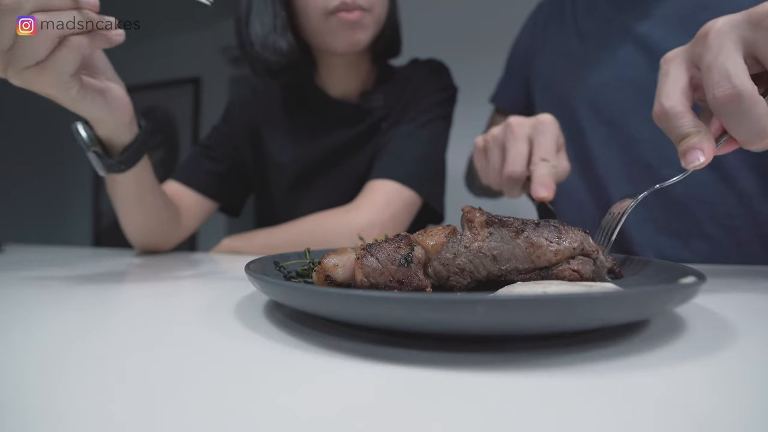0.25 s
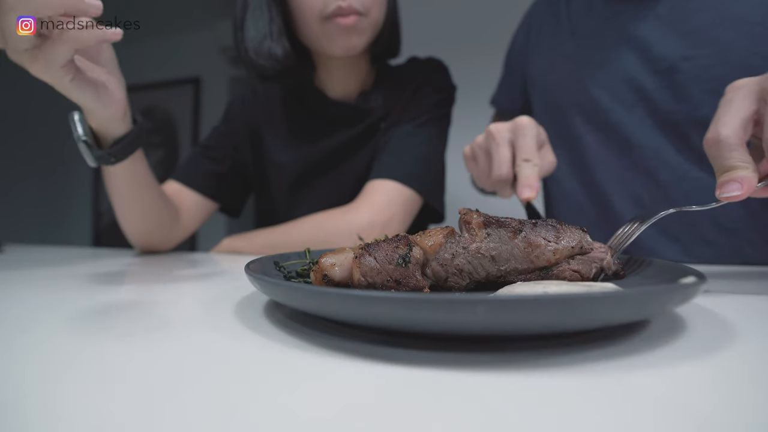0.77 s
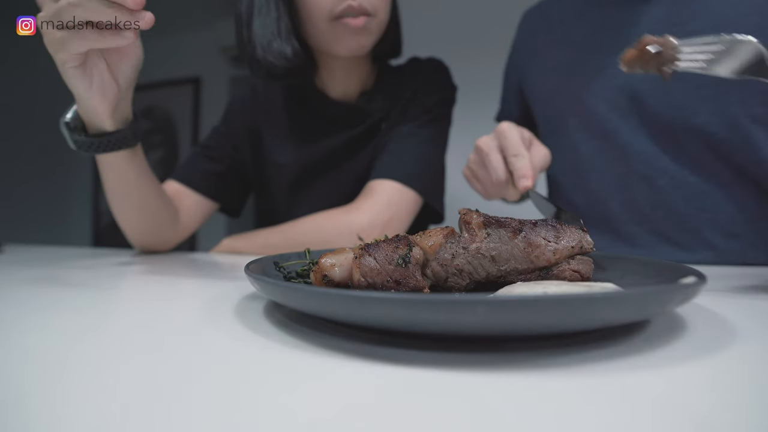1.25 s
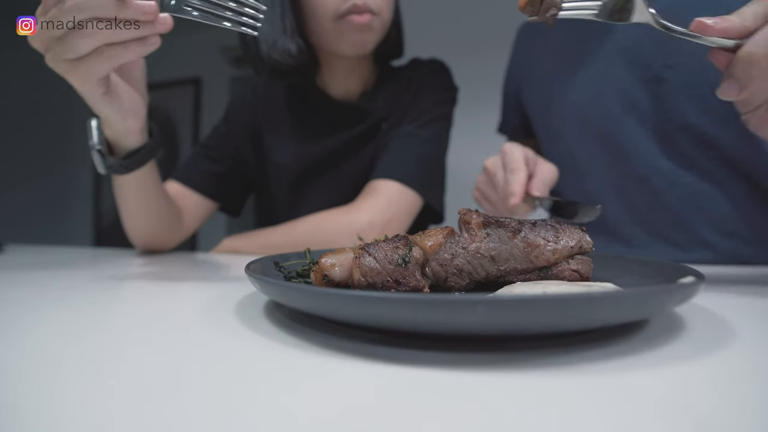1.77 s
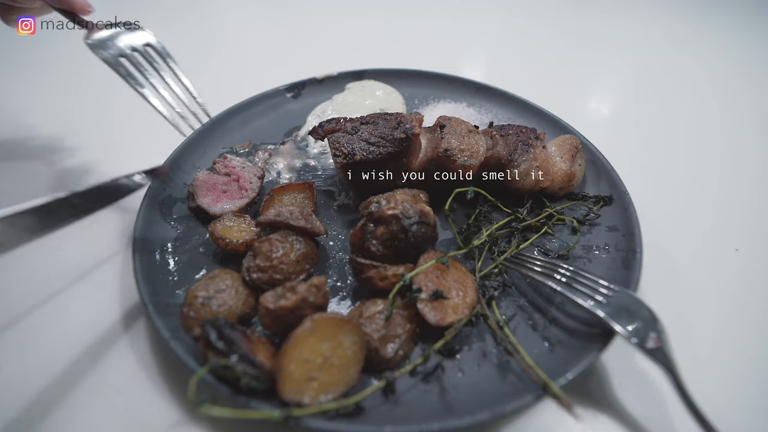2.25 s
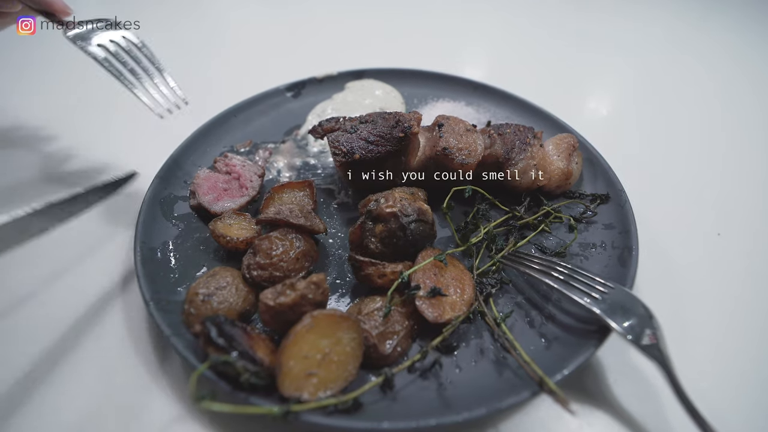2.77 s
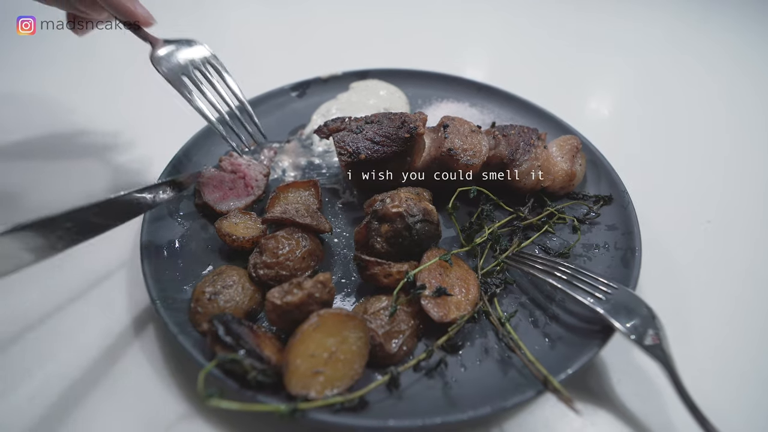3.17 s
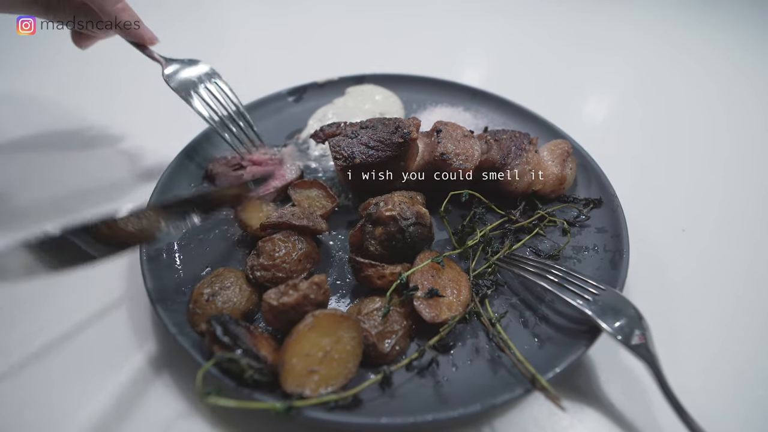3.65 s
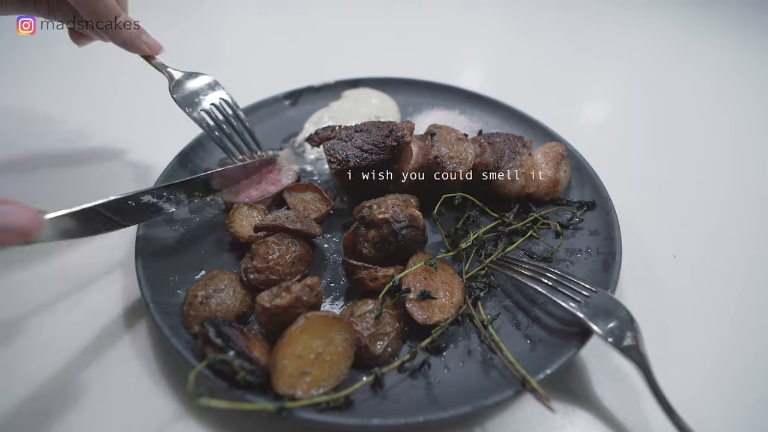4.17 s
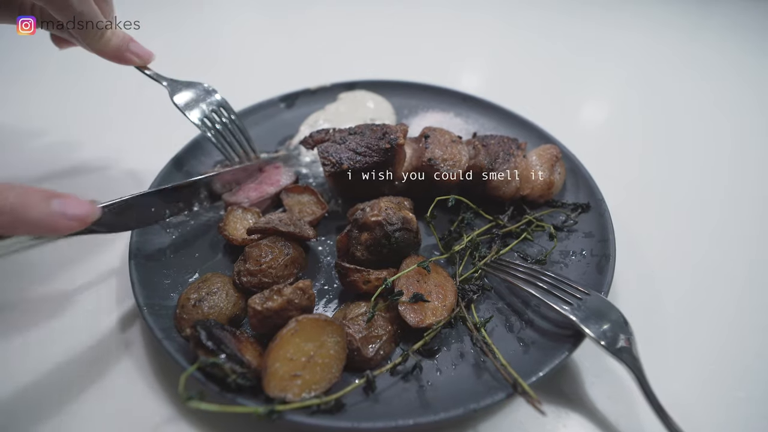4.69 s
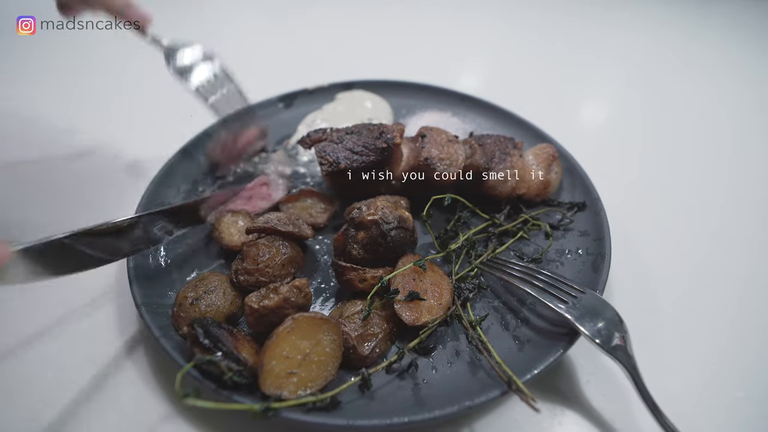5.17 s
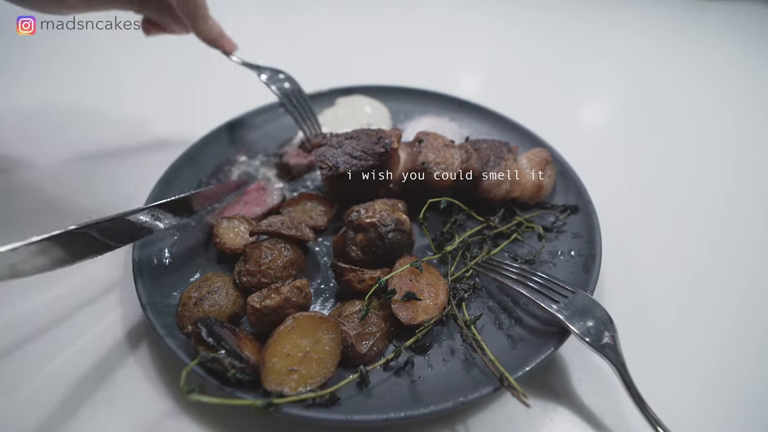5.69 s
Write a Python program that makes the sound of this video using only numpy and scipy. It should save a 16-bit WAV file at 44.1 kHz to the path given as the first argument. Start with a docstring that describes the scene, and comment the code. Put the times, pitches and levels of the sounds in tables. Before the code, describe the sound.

Two hard fork thuds and gritty scraping in a humming room; the hum drops, then a knife rings twice on ceramic, saws and squeaks.

```python
"""A steady ventilation rush in a small, live room, and a fork that jabs twice through steak and drags on glaze.
The rush drops in level, and a steel knife clinks twice on the plate, saws with ticks and scrapes, and squeaks.
Impacts are damped modes and shaped noise bursts; the plate sings as a sum of shimmering modes; scrapes are
random slips coloured by resonances; the squeak is a fluttering tone; the air is filtered noise."""
import sys
import numpy as np
from scipy import signal
from scipy.fft import rfft, irfft, next_fast_len
from scipy.io import wavfile
from scipy.ndimage import uniform_filter1d, map_coordinates

SR = 44100
rng = np.random.default_rng(int(sys.argv[2]) if len(sys.argv) > 2 else 0)


def store_wav(level_fs):
    """Save 16-bit WAV to argv[1]."""
    pcm = np.round(np.clip(np.atleast_2d(level_fs), -1, 1) * 32767)
    wavfile.write(sys.argv[1], SR, pcm.T.astype(np.int16))


N = 261513

# All table levels are relative, except where a source adds them to the mix directly.
# Knife blows on the plate: [t/s, crack level/dB, ring level/dB, share of the free ringing time]
CLINKS = [(3.391, 12, -24.5, 0.86), (4.6158, 9.5, -32.5, 0.88)]
# Colour of the crack: [f/Hz, level/dB at the first spot, level/dB at the second spot]
CRACK_COLOUR = [(80, -48, -40), (333, -17.5, -33.5), (574, -13, -18), (1100, -8.5, -14), (1750, -17.5, 1.5),
                (2250, -16, -3.5), (2850, 0, 2), (3100, 3.5, -2.5), (3420, -21.5, 1.5), (3920, -1, -3.5),
                (4500, -18, -11), (6100, -11.5, -11), (6700, -25.5, -21), (15000, -50.5, -41.5)]
# Plate modes: [f/Hz, shimmer rate/(knots per s), free t60/s, level/dB at first spot, level/dB at second spot]
PLATE_MODES = [(500, 59, 0.53, -7.5, -28), (684, 240, 0.58, -5.5, -4), (1100, 300, 0.28, -6.5, -7.5),
               (1283, 99, 0.53, -14.5, -2), (1830, 200, 0.2, -9, -19), (2130, 300, 1.06, -15, -4.5),
               (2475, 92, 1.24, -5.5, -9), (2770, 400, 1.66, -10, -8), (3278, 120, 2, -6, -13),
               (3380, 86, 1.7, 0.5, -9), (3540, 200, 1.76, -7.5, -1.5), (3880, 150, 1.3, -11.5, -22),
               (4805, 5, 0.74, -8, -28), (4800, 230, 1, -15, -10.5), (5640, 300, 0.93, -17, -24.5),
               (6283, 6.8, 0.87, -15, -17), (6400, 190, 0.15, -31, 5.5), (7800, 250, 0.44, -16.5, -11.5),
               (9400, 140, 0.5, -29, -20.5), (11180, 60, 0.33, -30.5, -41.5),
               (11300, 39, 0.23, -54.5, -14.5)]
# Strokes of the knife: [crest t/s, length/s, level/dB, hiss of the teeth/dB, ring of the blade/dB]
SAW_STROKES = [(4.9, 0.15, -39, -12.5, -10), (5.083, 0.12, -39.5, -23, -16), (5.245, 0.12, -36, -28, -14.5),
               (5.32, 0.068, -46, -21, -12), (5.542, .25, -63, -27, -10)]
# Colour of the edge scraping on the plate: [f/Hz, level/dB]
SAW_COLOUR = [(1500, -33), (2200, -38), (2450, 6.5), (2700, -11), (2950, 8), (3170, -3), (3350, 0.5),
              (3720, 0.5), (4100, -26), (5000, -29), (5900, -18), (6300, -27), (6900, -45), (10000, -48.5)]
# Colour of the hissing teeth: [f/Hz, level/dB]
TEETH_COLOUR = [(6000, -17), (7700, -11), (9200, -0.5), (9800, -13), (11500, -32), (12800, -25),
                (14000, -22), (15500, -37)]
# Colour of the ringing blade: [f/Hz, level/dB]
BLADE_COLOUR = [(4000, -47), (5150, -19), (5500, -1.5), (5850, 2), (6300, -20), (8000, -44.5)]
# Small ticks of steel in the meat and on the glaze: [t/s, level/dB, f/Hz, plate level relative to steel/dB]
TICKS = [(2.1725, -14.5, 7500, -28), (2.1735, -15.5, 4410, -20), (2.191, -35, 7000, -13),
         (2.1985, -28, 5440, -7), (4.191, -50.5, 5000, 27.5), (4.239, -20.5, 7000, 7),
         (4.2449, -23, 7200, -1), (4.284, -27.5, 6770, -1.5), (4.324, -33, 7200, -11),
         (4.85, -19.5, 6330, -1), (5.0256, -11, 6300, -24), (5.091, -27, 6940, 14),
         (5.327, -27.5, 6700, -3), (5.584, -38, 5900, 5), (5.747, -45, 7500, 22.5)]
# Resonance of the ticking steel: [f relative to the pitch of the tick, level/dB]
TICK_STEEL = [(1 / 4, -40), (0.82, -26), (0.87, -9), (1, 0), (1.096, -8), (1.43, -32), (1.7, -50)]
# Colour of the plate under a tick: [f/Hz, level/dB]
TICK_PLATE = [(200, -30), (1700, -17), (2600, 3), (3400, 5), (4600, -18), (12000, -57)]
# Soft bumps of the cutlery: [t/s, level/dB, f/Hz]
BUMPS = [(4.862, -29.5, 597), (5.073, -39.5, 890), (5.754, -30.5, 647)]
# Grabs of the squeaking steel: [crest t/s, length/s, level/dB]
SQUEAK_GRABS = [(5.831, 0.046, -21), (5.869, 0.021, -27), (5.921, .026, -28.5)]
# Colour of the rasp over the squeak: [f/Hz, level/dB]
SQUEAK_COLOUR = [(2000, -30), (2800, 4.5), (3100, -12), (3650, -15.5), (3950, 3.5), (4450, -11), (4750, -1),
                 (5200, -29), (6000, -25), (7500, -16), (8600, -18), (9700, -27), (10300, -34),
                 (15000, -46)]
# Fork jabs, two strong and the rest faint: [t/s, thud level/dB, prong ring level/dB]
JABS = [(0.0644, -6.5, -7.5), (0.3552, -9, -15), (0.597, -39.5, -52), (.999, -60, -46), (1.091, -43, -43),
        (1.114, -39.5, -60)]
# Modes of the plate under the tines, damped by the meat: [f/Hz, level/dB, time to the crest/s]
THUD_MODES = [(370, -13, 0.002), (1034, -12, 0.0019), (1195, -25, 0.0022), (2482, -4.5, 0.0027),
              (2744, -3.5, 0.0028), (3285, 0, 0.002), (3740, -15.5, 0.0024), (8630, -16, 0.0009),
              (13000, -33.5, .0006)]
# Modes of the prongs, which ring on bare glaze: [f/Hz, level/dB, time to the crest/s]
PRONG_MODES = [(4130, -25.5, 0.0022), (5220, -16.5, 0.00083), (5700, -19, 0.00215), (6270, -21.5, 0.002023)]
# Colour of the snap of the tines: [f/Hz, level/dB]
SNAP_COLOUR = [(100, -41), (1500, -7.5), (5500, -7.5), (9000, 2.5), (16000, -16.5)]
# Pushes of the fork over the glaze: [crest t/s, length/s, level/dB]
FORK_PUSHES = [(0.065, 0.024, -39.5), (0.165, 0.48, -54), (0.363, 0.038, -32.5), (0.468, 0.09, -42),
               (0.611, 0.03, -42.5), (.645, 0.096, -42.5), (0.784, 0.17, -44), (0.929, 0.12, -46),
               (1.088, 0.24, -47.5)]
# Colour of the tines scraping on the glaze: [f/Hz, level/dB]
FORK_COLOUR = [(1500, -29), (2100, -14.5), (2450, 0), (2750, -5.5), (3000, -14), (3450, -7), (4200, -26),
               (4850, -25), (5200, -26.5), (5800, -21), (8600, -34), (10000, -27), (11500, -38.5),
               (14200, -29), (15500, -42.5)]
# Decay of the room: [f/Hz, t60/s]
ROOM_DECAY = [(200, 0.62), (700, 0.81), (3000, 0.45), (6000, 0.55), (10000, 0.29), (15000, 0.53)]
# Spectral density of the room air before the drop: [f/Hz, level/dB per Hz]
AIR_LOUD = [(15, -68.5), (25, -46), (59, -47), (84, -32), (145, 0.5), (256, -5), (285, 2.5), (354, -9),
            (416, -5.5), (641, -9.5), (818, -7), (1610, -20), (2410, -23), (4250, -34), (16000, -47.5)]
# Spectral density of the room air after the drop: [f/Hz, level/dB per Hz]
AIR_SOFT = [(15, -63.5), (25, -41), (70, -38), (84, -19), (141, -1.5), (195, -2.5), (285, -3.5), (489, -5),
            (591, -7.5), (714, -6), (936, -10), (1290, -12), (5280, -32), (6050, -37.5), (16000, -43.5)]
# Bands of the fan drone: [f/Hz, half-width at half amplitude/Hz, band level/dB]
FAN_BANDS = [(99.9, 5.8, -6.5), (136, 6.1, -12.5), (159.4, 1.6, 1), (219, 22, 3), (267, 18, -7),
             (299.3, 15, -0.5), (410, 14, -2), (703, 14.8, -14.5), (810, 43, -6), (1291, 106, -2)]
# Colour of the thin hiss after the drop: [f/Hz, level/dB]
HISS_COLOUR = [(300, -30), (2500, -1.5), (7000, 0.5), (16000, 7)]

REBOUND_S, REBOUND_DB = 0.0087, -15.5  # mean delay and relative level of the second touch after a tick
SQUEAK_HZ, SQUEAK_PULL_HZ = 2416, 44.3  # mode it locks on to and rise at the hardest grab, before jitter
RASP_FROM_S, RASP_ATTACK_S, RASP_HOLD_S = 5.822, 0.0033, 0.021  # the edge breaks loose; hold includes attack
RASP_DB, RASP_FALL_DB_PER_S = -36.5, 450
QUIET_FROM_S = 2.202  # the rush drops in level here
TOP_HZ = 16200  # upper band limit


def knife_clinks(damped_s=0.27):
    """Modal excitation: a hard crack sets the plate singing, and the spot struck weights its modes."""
    cracks, rings = np.zeros(N), np.zeros(N)
    t = np.arange(SR) / SR
    pressing = amp(-(t / damped_s) ** 3)  # the cutlery bears down: 1 dB extra loss at damped_s
    onset = 1 - np.exp(-t / 0.0006)
    for spot, (s, crack_db, ring_db, hold) in enumerate(CLINKS):
        colour = [(hz, levels[spot]) for hz, *levels in CRACK_COLOUR]
        add(cracks, s, amp(crack_db) * crack(colour, contact_s=0.0008))
        ring = 0
        for hz, rate, t60, *levels in PLATE_MODES:
            decay = amp(levels[spot] - 60 * t / (t60 * hold))
            ring = ring + decay * shimmer(hz, rate, t)
        add(rings, s, amp(ring_db) * ring * pressing * onset)
    return in_room(cracks, wet_db=-6.0) + rings


def knife_saw():
    """Sliding friction: each stroke excites the plate, the ringing blade and its hissing teeth."""
    rasp = friction(SAW_COLOUR, slips_per_s=4300)
    teeth = friction(TEETH_COLOUR, slips_per_s=2940)
    blade = friction(BLADE_COLOUR, slips_per_s=2100, shift_db=4.5)
    strokes = np.zeros(N)
    for s, length, db, teeth_db, blade_db in SAW_STROKES:
        force = amp(db) * swell(s, length, rise_share=0.55, shape=1.46)
        strokes += force * (rasp + amp(teeth_db) * teeth + amp(blade_db) * blade)
    unevenness = amp(1.74 * wobble(60))
    return in_room(unevenness * strokes, wet_db=-5.5)


def ticks():
    """Release and rebound: the blade catches, lets go and touches again; steel and plate answer, with some bumps."""
    out = np.zeros(N)
    for s, db, hz, plate_db in TICKS:
        steel_colour = [(hz * ratio, level) for ratio, level in TICK_STEEL]
        rebound_s = REBOUND_S * (1 + 0.2 * rng.uniform(-1, 1))
        for delay_s, loss_db in [(0, 0), (rebound_s, REBOUND_DB)]:
            steel = crack(steel_colour, contact_s=0.000572)
            plate = crack(TICK_PLATE, contact_s=0.00081)
            add(out, s + delay_s, amp(db + loss_db) * (steel + amp(plate_db) * plate))
    for s, db, hz in BUMPS:
        add(out, s, amp(db) * ping(hz, crest_s=0.00094))
    return in_room(out, wet_db=-16.5)


def squeak():
    """Stick-slip locking: friction holds to one plate mode, sharper under more force, with a rasp on top."""
    grip = sum(amp(db) * swell(s, length, rise_share=0.5, shape=1.23) for s, length, db in SQUEAK_GRABS)
    pitch_hz = SQUEAK_HZ + SQUEAK_PULL_HZ * grip / grip.max()
    jitter = 1 + 0.0205 * wobble(400)
    phase = 2 * np.pi * np.cumsum(pitch_hz * jitter) / SR
    flutter = unit(1 + 1.1 * np.tanh(wobble(350)))
    tone = grip * flutter * (np.sin(phase) + amp(-28) * np.sin(2 * phase))
    t = np.arange(N) / SR - RASP_FROM_S
    attack = np.clip(t / RASP_ATTACK_S, 0, 1)
    skid = attack * amp(RASP_DB - RASP_FALL_DB_PER_S * np.maximum(t - RASP_HOLD_S, 0))
    rasp = skid * friction(SQUEAK_COLOUR, slips_per_s=2400, shift_db=2.5)
    return in_room(tone + rasp, wet_db=-4.5)


def fork_jabs():
    """Damped impact: the tines break through the meat and stop dead, so plate and prongs ring only briefly."""
    thuds, snaps = np.zeros(N), np.zeros(N)
    for s, db, prong_db in JABS:
        add(thuds, s, amp(db) * struck(THUD_MODES))
        add(snaps, s, amp(prong_db) * struck(PRONG_MODES))
        add(snaps, s, amp(db - 5.5) * crack(SNAP_COLOUR, contact_s=0.00071))
    return in_room(thuds, wet_db=-11.5) + in_room(snaps, wet_db=-4.5)


def fork_drag():
    """Sliding friction: the tines skid over the glaze in short, gritty pushes."""
    force = sum(amp(db) * swell(s, length, rise_share=0.61, shape=1.7) for s, length, db in FORK_PUSHES)
    grit = amp(1.513 * wobble(90))
    return in_room(force * grit * friction(FORK_COLOUR, slips_per_s=2400, shift_db=4.5), wet_db=-4.5)


def air(spectrum, rush_db, drone_db):
    """Flow noise: ventilation makes a broad rush, and a fan adds narrow, wavering resonance bands."""
    def fan_response(f):
        return sum(amp(db) / np.sqrt(width) / (1 + ((f - hz) / width) ** 2) for hz, width, db in FAN_BANDS)

    drone = unit(filtered(rng.standard_normal(N), fan_response))
    rush = coloured(rng.standard_normal(N), spectrum)
    return amp(rush_db) * rush + amp(drone_db) * drone


def settling_hiss(hiss_db=-69, fade_s=0.31):
    """Gaussian decay: a thin hiss is present from the drop of the rush and fades away."""
    after = np.arange(N) / SR - QUIET_FROM_S
    fade = (after > 0) * np.exp(-(after / fade_s) ** 2)
    return amp(hiss_db) * fade * coloured(rng.standard_normal(N), HISS_COLOUR)


def in_room(x, wet_db, wall_s=0.026, wall_db=-14):
    """Reverberation: direct sound, one wall's echo and noise decaying at a rate set by frequency."""
    hz, t, z = signal.stft(rng.standard_normal(SR), SR, nperseg=256)
    decay = amp(-60 * t / along(ROOM_DECAY, hz)[:, None])
    tail = signal.istft(z * decay, SR, nperseg=256)[1]
    tail = np.pad(tail / np.linalg.norm(tail), (SR // 300, 0))  # the room's answer starts after 1/300 s
    tail[round(wall_s * SR)] += amp(wall_db)
    return x + amp(wet_db) * signal.fftconvolve(x, tail)[:N]


def friction(spectrum, slips_per_s, shift_db=0.5):
    """Random slip: tiny uneven slips ring steel and plate; resonances shift as the contact point moves."""
    slips = rng.standard_normal(N) * (rng.random(N) < slips_per_s / SR)
    z = signal.stft(slips, nperseg=512)[2]
    field = uniform_filter1d(rng.standard_normal(z.shape), size=3, axis=0)  # smooth over frequency
    field = uniform_filter1d(field, size=8, axis=1)  # smooth over time
    shifting = signal.istft(z * amp(shift_db * unit(field)), nperseg=512)[1][:N]
    return coloured(shifting, [(100, -75.5)] + list(spectrum))


def swell(crest_s, length_s, rise_share, shape):
    """Force envelope: a push of the hand rises to 1 and lets go; its length is counted 20 dB down."""
    t = np.arange(N) / SR - crest_s
    away = np.abs(t) / (length_s * np.where(t < 0, rise_share, 1 - rise_share))
    return amp(-20 * away ** shape)


def crack(spectrum, contact_s, size=2048):
    """Chattering contact: a short noise burst passes a causal, minimum-phase colour, at energy 1."""
    u = np.arange(size) / SR / contact_s
    burst = rfft(rng.standard_normal(size) * u * np.exp(-u))
    chatter = irfft(burst / np.abs(burst))[:size // 4]  # magnitudes flattened, then cut short
    cepstrum = irfft(np.log(amp(along(spectrum, np.fft.rfftfreq(size, 1 / SR)))))
    colour = np.exp(rfft(2 * cepstrum[:size // 2], size))  # folded cepstrum gives minimum phase
    blow = irfft(rfft(chatter, size) * colour)
    return blow / np.linalg.norm(blow)


def shimmer(hz, rate, t, flutter_db=-8):
    """Narrow-band beating: the strength and phase of a mode wander and flutter."""
    def wander(knots_per_s):
        return wobble(knots_per_s, size=len(t)) + 1j * wobble(knots_per_s, size=len(t))

    sway = wander(rate) + amp(flutter_db) * wander(3.5 * rate)
    return unit(np.real(sway * np.exp(2j * np.pi * hz * t)))


def ping(hz, crest_s):
    """Heavy damping: the envelope of a mode swells to 1 at the crest and soon dies."""
    t = np.arange(SR // 20) / SR
    envelope = (t / crest_s * np.exp(1 - t / crest_s)) ** 2
    return envelope * np.sin(2 * np.pi * hz * t)


def struck(modes):
    """Superposition: an impact sounds as the sum of its damped modes."""
    return sum(amp(db) * ping(hz, crest_s) for hz, db, crest_s in modes)


def wobble(rate, size=N):
    """Band-limited randomness: a smooth curve through random knots, rate of them per second."""
    knots = rng.standard_normal(int(size * rate / SR) + 4)
    return map_coordinates(knots, [np.arange(size) * rate / SR])


def filtered(x, response):
    """Linear filtering: the spectrum of x times a response of frequency."""
    m = next_fast_len(N + SR // 2)
    return irfft(rfft(x, m) * response(np.fft.rfftfreq(m, 1 / SR)), m)[:N]


def coloured(x, spectrum):
    """Spectral shaping: x takes on an f/Hz, level/dB colour, at rms 1."""
    return unit(filtered(x, lambda hz: amp(along(spectrum, hz))))


def along(points, hz):
    """Logarithmic interpolation: points are joined by straight lines on a log frequency axis."""
    f, v = np.transpose(points)
    return np.interp(np.log(hz + 1), np.log(f + 1), v)


def amp(db):
    """Level law: decibels to amplitude gain."""
    return 10 ** (np.asarray(db) / 20)


def unit(x):
    """Normalisation: scale to rms 1."""
    return x / np.sqrt(np.mean(x ** 2) + 1e-20)


def add(track, s, sound):
    """Superposition: mix a sound into the track at time s, in seconds."""
    part = track[round(s * SR):][:len(sound)]
    part += sound[:len(part)]


def scene():
    """Superposition: knife and fork sound over the room's air, which drops in level once."""
    knife = knife_clinks() + knife_saw() + ticks() + squeak()
    fork = fork_jabs() + fork_drag()
    early = np.arange(N) / SR < QUIET_FROM_S
    loud = air(AIR_LOUD, rush_db=-42, drone_db=-47.5)
    soft = air(AIR_SOFT, rush_db=-51, drone_db=-56)
    background = np.where(early, loud, soft) + settling_hiss()
    return (knife + fork + background)[None]


def record(dry):
    """Saturation and band limiting: peaks clip at full scale, then all above TOP_HZ is removed."""
    clipped = np.clip(dry[0], -1, 1)
    return filtered(clipped, lambda hz: hz < TOP_HZ)[None]


dry = scene()
out = record(dry)
store_wav(out)
```